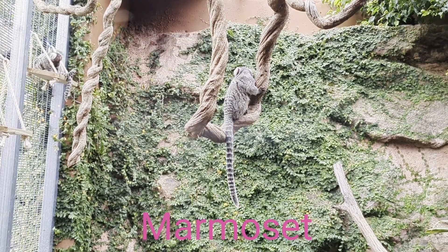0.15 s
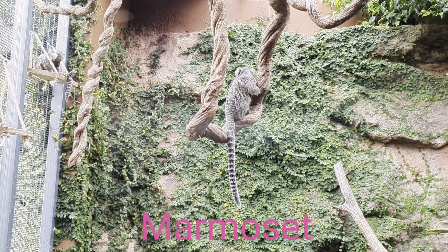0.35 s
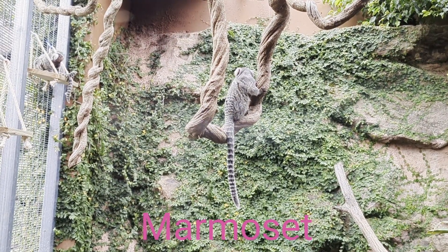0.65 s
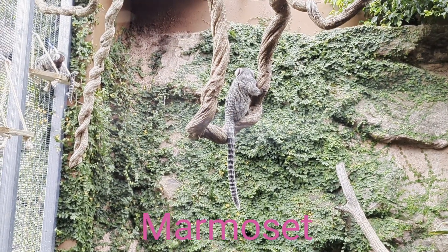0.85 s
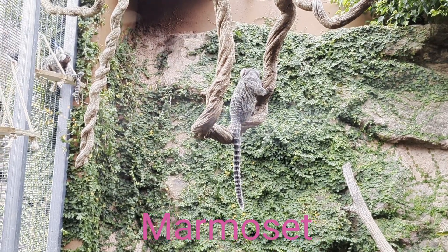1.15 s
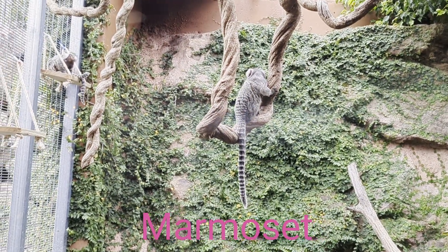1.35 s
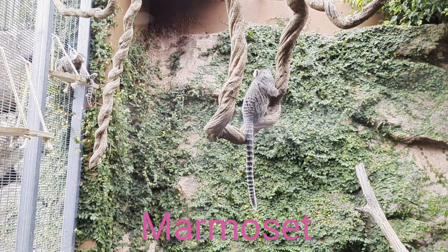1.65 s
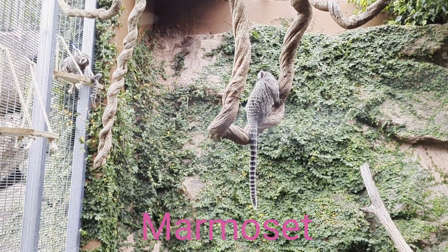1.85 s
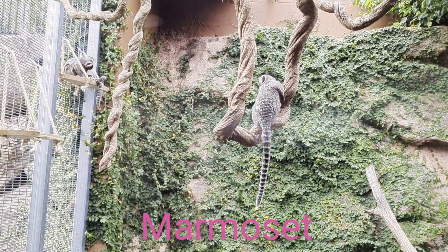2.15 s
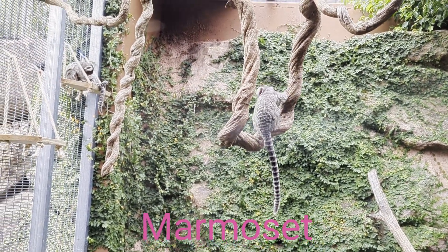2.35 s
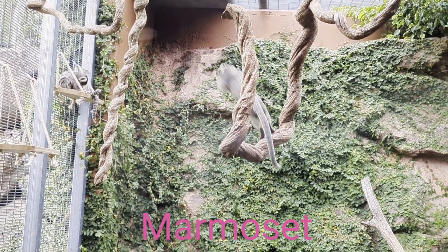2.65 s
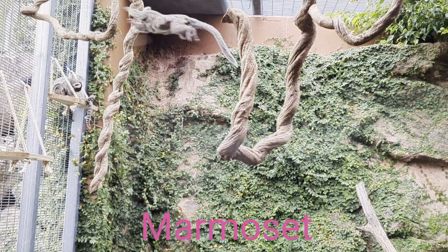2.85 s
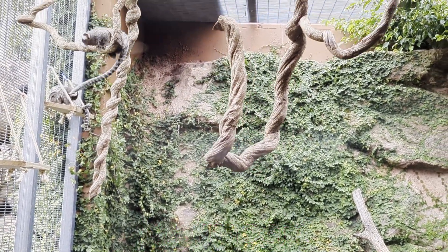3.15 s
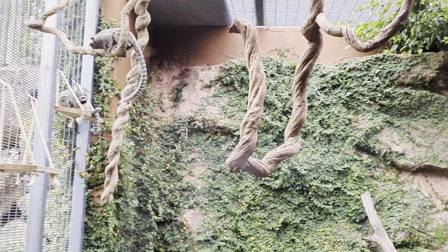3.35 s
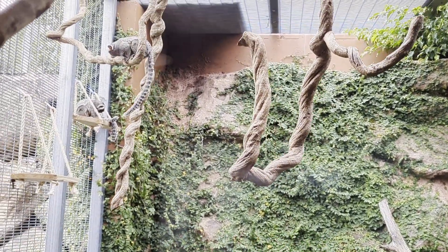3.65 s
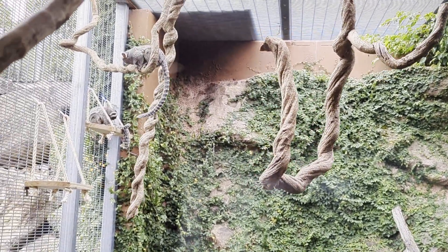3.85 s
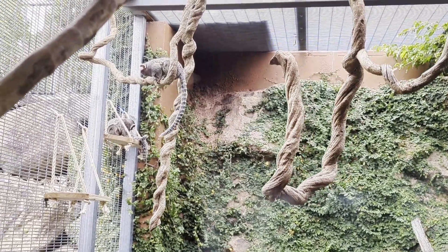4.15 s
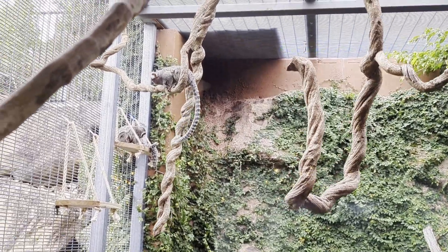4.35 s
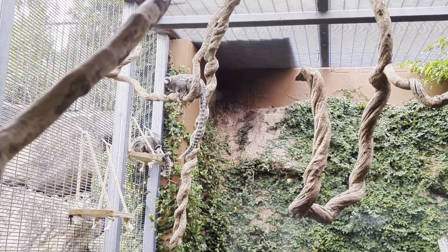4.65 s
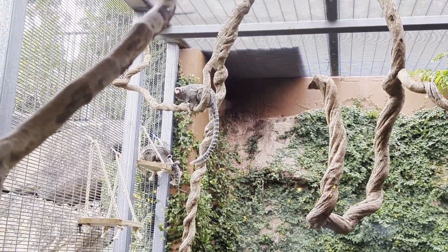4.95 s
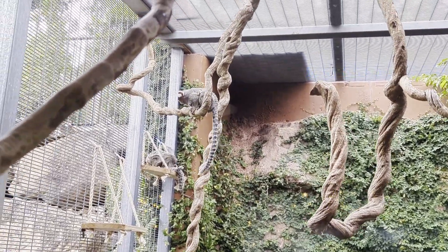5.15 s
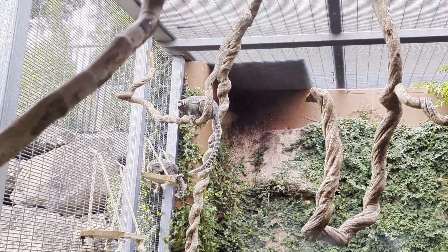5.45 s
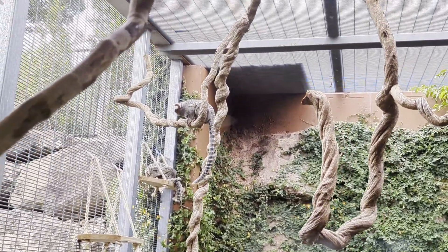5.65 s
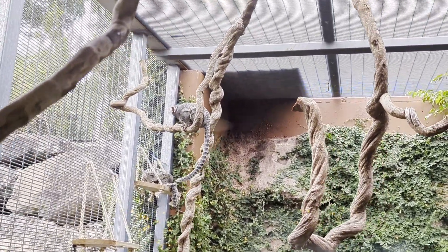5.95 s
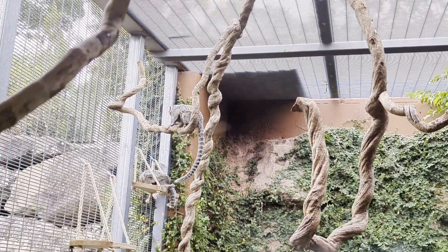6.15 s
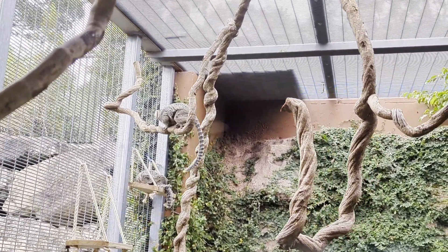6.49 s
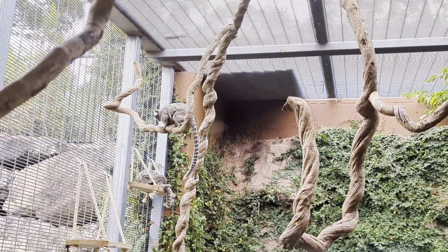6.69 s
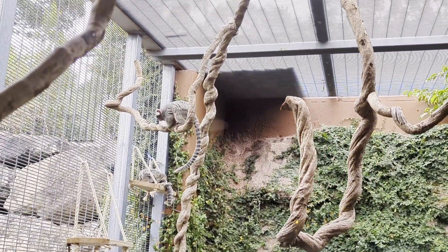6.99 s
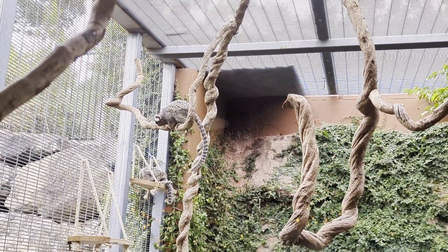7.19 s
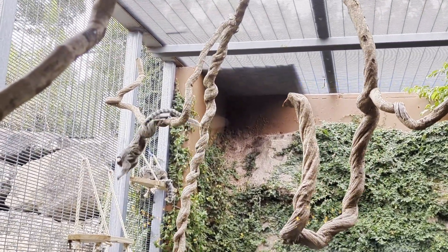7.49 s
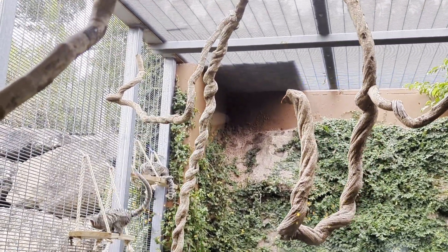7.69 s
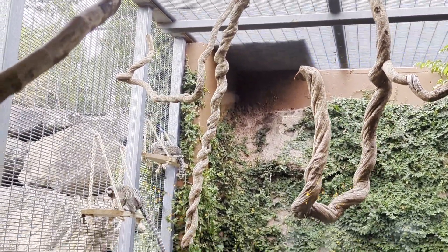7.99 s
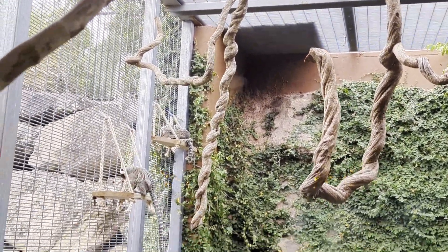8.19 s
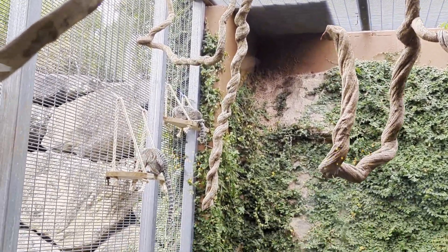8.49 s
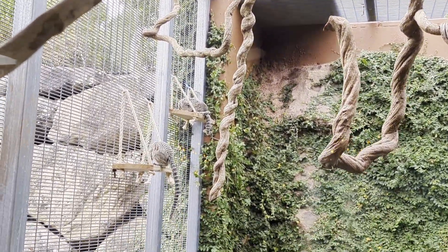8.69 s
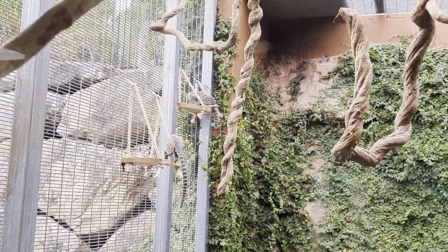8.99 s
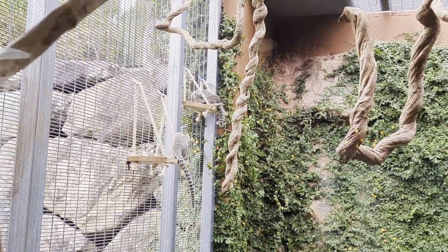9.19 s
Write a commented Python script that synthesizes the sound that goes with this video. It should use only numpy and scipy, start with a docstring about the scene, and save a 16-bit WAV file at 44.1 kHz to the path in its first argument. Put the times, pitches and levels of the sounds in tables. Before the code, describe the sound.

A somewhat distant microphone in a reverberant animal enclosure picks up airy, wavering background noise and tiny high monkey calls. Peeps and ticking chips come first, then a descending series of quick upward chirps, a scratchy scrabble as one animal jumps, and four brighter chirps. Then five piercing near-sine whistles climb, swell unevenly and drop off suddenly, with light echo from the walls and the noise thinning beneath them.

```python
"""Marmosets call in a rock-walled enclosure, over a ventilation-like haze of shaped noise that swells and sinks.
Thin gliding peeps and faint far chips come first, then a twitter of quick upward sweeps with a leap in pitch.
One animal leaps off a rope with a rustle of grainy noise, and a second twitter follows.
Five long rising whistles close it: near-sines, swelled by standing waves. The walls ring after every call,
and a noise suppressor turns the haze down under each held whistle."""
import sys
import numpy as np
from scipy import signal
from scipy.fft import rfft, irfft, next_fast_len
from scipy.io import wavfile
from scipy.ndimage import uniform_filter1d, minimum_filter1d, map_coordinates

SR = 44100
rng = np.random.default_rng(int(sys.argv[2]) if len(sys.argv) > 2 else 0)


def dump(signal):
    """Clip the signal to [-1, 1] and save it as 16-bit WAV at the path in sys.argv[1]."""
    limited = np.clip(np.atleast_2d(signal).T, -1, 1)
    pcm = np.round(limited * 32767).astype(np.int16)
    wavfile.write(sys.argv[1], SR, pcm)


N = 411453


def amp(db):
    """Level in decibels to amplitude ratio."""
    return 10 ** (np.asarray(db) / 20)


def evened(x):
    """Scales to unit effective (rms) amplitude."""
    return x / np.sqrt(np.mean(x ** 2) + 1e-20)


def read(points, hz):
    """Interpolates a table linearly along a logarithmic frequency axis."""
    f, value = np.transpose(points)
    return np.interp(np.log(hz + 1), np.log(f + 1), value)


def add(mix, s, sound):
    """Superposes a sound on the mix from time s [s], in place."""
    part = mix[max(round(s * SR), 0):][:len(sound)]
    part += sound[:len(part)]


def noise(gain):
    """Filtered noise: white noise weighted by the spectrum gain(Hz), brought to rms 1."""
    size = next_fast_len(N)
    spectrum = rfft(rng.standard_normal(size)) * gain(np.fft.rfftfreq(size, 1 / SR))
    return evened(irfft(spectrum, size)[:N])


def waver(size, hz):
    """Band-limited random modulation: a smooth curve through hz normal random values per second."""
    position = np.arange(size) / SR * hz
    return map_coordinates(rng.standard_normal(4096), [position], order=3, mode="wrap")


def voice(hz, level, octave, jitter, jitter_hz=260):
    """Frequency modulation: a sine of randomly unsteady pitch (jitter is a share of it) and its second harmonic."""
    unsteady_hz = hz * (1 + jitter * waver(len(hz), hz=jitter_hz))
    phase = 2 * np.pi * np.cumsum(unsteady_hz) / SR
    return np.sqrt(2) * (level * np.sin(phase) + octave * np.sin(2 * phase))


def whistle(s, length, db, start_hz, plateau_hz, settle_s, lift_hz, lift_s, drop_s, low_hz, fade_db,
            bright_db, octave_fade_db=-7, drop_jitter=0.023, edge_s=0.0012):
    """Resonance under a glide: with even effort, the loudness follows the standing waves the pitch passes through.

    The pitch scoops up to a plateau and lifts under a last push; as the pressure gives out it drops, unsteady."""
    # standing waves between the walls: (centre [Hz], half width at 1/e of the gain [Hz], gain [dB])
    standing = [(5994, 52, 9), (6070, 10, -9), (6087, 33, 11.5), (6150, 12, -8.5), (6201, 64.4, 17),
                (6310, 14, -7.5), (6375, 70, 7), (6527, 50, 6), (6560, 15, -11.5), (6667, 89, 15),
                (6870, 32, -8), (6880, 82, 10), (7161, 50, 6), (7477, 520, 18.7)]
    # level of the octave before its trim and wander: (frequency of the octave [Hz], level [dB])
    octave_level = [(11400, -73.5), (12200, -58.5), (12700, -49), (13050, -48.5), (13300, -49),
                    (14200, -50), (15400, -53)]
    onset_db, onset_s = -5.5, 0.034  # softer start, and the time constant of filling out
    flat_hz, flat_s = 230, 0.012  # flat start, and the time constant of catching the pitch
    wander_hz, wander_per_s = 4.4, 54  # random pitch wander and its rate
    crest_s = 0.006  # the lift crests this long before the drop

    t = np.arange(0, length + drop_s, 1 / SR)
    held = np.minimum(t, length)
    scoop = (start_hz - plateau_hz) * np.exp(-held / settle_s)
    lift = lift_hz * np.exp(-((length - crest_s - held) / lift_s) ** 2)
    hz = plateau_hz + scoop + lift - flat_hz * np.exp(-t / flat_s)
    hz = hz + wander_hz * waver(len(t), hz=wander_per_s)
    drop = np.sin(np.pi / 2 * np.clip((t - length) / drop_s, 0, 1)) ** 2

    # the levels follow the pitch before the drop; the drop then fades them
    standing_db = sum(gain_db * np.exp(-((hz - centre) / width) ** 2) for centre, width, gain_db in standing)
    level_db = db + onset_db * np.exp(-t / onset_s) + standing_db + fade_db * drop
    octave_wander_db = 5 * waver(len(t), hz=30.23)
    octave_db = read(octave_level, 2 * hz) + bright_db + octave_wander_db + octave_fade_db * drop

    edges = np.clip(np.minimum(t, t[-1] - t) / edge_s, 0, 1)
    sliding_hz = hz + (low_hz - hz) * drop
    jitter = 0.0008 + drop_jitter * np.sqrt(drop)
    return s, edges * voice(sliding_hz, amp(level_db), amp(octave_db), jitter, jitter_hz=900)


def twitter(s, db, lead, above_hz, flick, flick_hz, start_db=-26.5, knee_db=0.0, flick_db=-22, octave_db=-42):
    """Register leap: a slide grows louder, leaps up in pitch and ends in a fading upward flick."""
    # nominal speed and size: the curve of the slide makes it a little slower and the leap a little larger
    slide_hz_per_s, leap_hz = 51000, 719
    t = np.arange(-lead, flick, 1 / SR)
    slide = np.clip(1 + t / lead, 0, 1)
    up = np.clip(t / flick, 0, 1)

    slide_left = 1 - np.sin(0.98 * slide) / np.sin(1.1)
    lead_in_hz = above_hz - leap_hz - slide_hz_per_s * lead * slide_left
    rising_hz = above_hz + flick_hz * (0.296 * up + 0.78 * up ** 5)
    hz = np.where(t < 0, lead_in_hz, rising_hz)

    lead_in_db = start_db + (knee_db - start_db) * slide ** 2
    level = amp(db + np.where(t < 0, lead_in_db, flick_db * up ** 3))
    level = uniform_filter1d(level, size=30) * signal.windows.tukey(len(t), 0.08)
    octave = amp(db + octave_db) * np.sin(np.pi * slide)  # heard in the lead-in only
    return s - lead, voice(uniform_filter1d(hz, size=20), level, octave, jitter=0.031, jitter_hz=587)


def peep(s, length, db, start_hz, end_hz, bend=1.45):
    """Frequency glide: a short near-sine whose pitch flattens towards its end."""
    u = np.linspace(0, 1, round(length * SR))
    level = amp(db) * signal.windows.tukey(len(u), 0.5)
    hz = end_hz + (start_hz - end_hz) * (1 - u) ** bend
    return s, voice(hz, level, amp(-50) * level, jitter=0.0041)


def scrabbles(grain_db=3, grain_hz=600, snaps_per_s=170, snap_db=-2):
    """Friction noise: claws drag over fibre in grainy bursts, with small snaps where they catch."""
    # bursts on rope and leaves: (time of the peak [s], level [dB], rise [s], decay [s])
    bursts = [(2.405, -45, 0.012, 0.015), (2.467, -29.5, 0.012, 0.03), (2.585, -27, 0.024, 0.044),
              (2.593, -21, 0.0017, 0.0042), (2.665, -39.5, 0.013, 0.066), (2.755, -35, 0.0024, 0.0047),
              (2.901, -42, 0.0046, 0.084), (2.947, -40, .004, 0.0064), (3.189, -37.5, 0.0038, 0.022),
              (3.235, -38, 0.0036, 0.015), (7.49, -57, 0.023, 0.0054), (8.892, -49.5, 0.037, 0.028),
              (8.99, -39, 0.003, 0.0037)]
    # colour of the rustle: (frequency [Hz], relative level [dB])
    rustle = [(290, -50), (500, -27), (863, -31), (1150, -6.5), (1650, -9.5), (1800, 1), (2010, -17),
              (2650, -5.5), (3010, -8.5), (3190, -19), (5510, -29.5), (8480, -9), (9930, -16),
              (10800, -37.5), (15500, -40.5)]
    t = np.arange(N) / SR
    push = np.zeros(N)
    for s, db, rise, decay in bursts:
        time_constants = np.maximum((s - t) / rise, (t - s) / decay).clip(0, 40)
        push += amp(db) * np.exp(-time_constants)
    drag = evened(rng.standard_normal(N) * amp(grain_db * waver(N, hz=grain_hz)))
    snaps = evened(np.tanh(rng.standard_normal(N)) * (rng.random(N) < snaps_per_s / SR))
    size = next_fast_len(N)
    colour = amp(read(rustle, np.fft.rfftfreq(size, 1 / SR)))
    rubbing = irfft(rfft(drag + amp(snap_db) * snaps, size) * colour, size)[:N]
    return push * evened(rubbing)


def bumps(hz=170, decay=0.0044, body_db=-9):
    """Heavily damped impact: dull knocks, each a low push and a puff that hardly ring."""
    # soft knocks: (time [s], level before the doubling below [dB])
    knocks = [(2.215, -43), (2.242, -46.5)]
    out, t = np.zeros(N), np.arange(SR // 10) / SR
    body = signal.butter(2, [220, 650], "bandpass", fs=SR, output="sos")
    for s, db in knocks:
        puff = amp(body_db) * evened(signal.sosfilt(body, rng.standard_normal(len(t))))
        knock = np.exp(-t / decay) * (np.sin(2 * np.pi * hz * t) + puff)
        add(out, s, amp(db) * 2 * knock)
    return out


def chip(s, db, hz, length=0.014, spread=0.038):
    """Random frequency modulation: fast jitter makes a tiny note raspy, almost a tick."""
    size = round(length * SR)
    level = amp(db) * np.hanning(size)
    return s - length / 2, voice(np.full(size, float(hz)), level, 0, jitter=spread, jitter_hz=815)


def haze(patchy_db=1.74, low_cut_hz=40):
    """Broadband noise in bands: roar, hiss and fan tones swell and sink while the rumble stays nearly steady."""
    # colours of the three noises: (frequency [Hz], relative level [dB])
    roar = [(76, -51), (130, -23.5), (326, -17), (364, -11.5), (470, -22.5), (600, -16.5), (706, -15.5),
            (786, -9.5), (853, -9), (1210, -1.5), (1350, -4.5), (1840, -6), (2000, -15), (2770, -8),
            (3300, -20.5), (4290, -47.5), (7260, -120)]
    hiss = [(2800, -16.5), (3200, -11), (3900, -3.5), (4300, -4.5), (4600, -12.5), (4850, -5.5),
            (5200, -3.5), (6200, -8.5), (7500, 5), (9600, -3), (10500, -14.5), (13500, -20.5),
            (15500, -29.5)]
    rumble = [(13, -49.5), (22, -3), (38, -2.5), (59, 3), (89, -1), (124, -13.5), (170, -20), (220, -46.5),
              (370, -120)]
    # fan tones as narrow noise bands: (frequency [Hz], level before the swell [dB], width at half amplitude [Hz])
    hum = [(54, -69, 8.1), (301.7, -69, 11), (613, -66, 47), (806.6, -62.5, 1.4), (1196.6, -55, 2.7),
           (1852, -62.5, 13)]
    # course of the haze: (time [s], low level [dB], middle level [dB], high level [dB])
    swell = [(0, -63.5, -51.5, -53), (1.1, -63.5, -51.5, -50.5), (2.5, -62, -47.5, -52.5),
             (4.5, -60, -45, -55), (4.802, -51, -50, -62), (5.25, -62, -57.5, -68),
             (5.749, -56.5, -53.5, -71.5), (6.3, -67, -58.5, -66.5), (7.35, -68, -58.5, -69.5),
             (8.101, -65, -52.5, -63.5), (8.499, -65.5, -56.5, -68.5), (8.899, -61.5, -48, -56),
             (9.33, -65.5, -51, -63)]
    # usual level of the haze: low, middle, high [dB]
    usual_db = [-60.5, -46, -52]
    # how far each frequency follows the low, middle and high level, one list each: (frequency [Hz], share)
    follow = ([(60, 0.2), (250, 0.36), (400, 1), (600, 0.77), (900, 0.41)], [(600, 0.055), (900, 0.61),
              (1800, 0.9), (2200, 0.42), (3200, 0.0066), (4500, 0.36), (8000, 0.35), (11000, 0.43),
              (14000, 0.063)], [(1800, 0), (2200, 0.27), (2900, 0.9), (3500, 0.25), (4500, 0), (9000, 0.26),
              (12000, 0)])

    # levels before the swell [dB]
    air = amp(-46.5) * noise(lambda f: amp(read(roar, f)))
    air += amp(-54.5) * noise(lambda f: amp(read(hiss, f)) * (f > 2000))
    air += amp(-58.5) * noise(lambda f: amp(read(rumble, f)) * np.minimum(f / low_cut_hz, 1) ** 8)
    for hz, db, width in hum:
        air += amp(db) * noise(lambda f: 1 / (1 + (1.34 * (f - hz) / width) ** 2) ** 2)

    f, t, z = signal.stft(air, SR, nperseg=1024, noverlap=768)
    s, *levels = np.transpose(swell)
    swell_db = sum(np.outer(read(shares, f), np.interp(t, s, level) - usual)
                   for shares, level, usual in zip(follow, levels, usual_db))
    # random louder and softer patches in time and frequency
    patches = uniform_filter1d(rng.standard_normal(z.shape), size=14, axis=0)
    patches = evened(uniform_filter1d(patches, size=8, axis=1))
    gain_db = swell_db + patchy_db * patches * (f[:, None] > 130)
    return signal.istft(z * amp(gain_db), SR, nperseg=1024, noverlap=768)[1][:N]


def enclosure(x, wet_db, early_db=4, early_s=0.031, with_echoes=True):
    """Reverberation: wall echoes, then a coloured diffuse ring, strongest at first and shortest at the very top."""
    # separate wall echoes: (delay [s], gain)
    wall_echoes = [(.0013, 0.12), (.0047, 0.46), (.0113, -0.1), (.0187, .16), (.029, 0.087)]
    # reverberation time without the early boost: (frequency [Hz], time to fall 60 dB [s])
    ring_time = [(300, 0.36), (2000, 0.44), (7000, 0.69), (10000, 0.75), (15000, 0.21)]
    # colour of the ring: (frequency [Hz], relative level [dB])
    walls = [(300, -1.5), (3000, -22), (4500, -7), (5400, 3.5), (5800, 2), (6150, -8.5), (6450, 1.5),
             (6800, -0.5), (7150, 1.5), (7550, 0), (8300, -0.5), (10000, -2.5), (15000, -1)]
    f, t, z = signal.stft(rng.standard_normal(SR), SR, nperseg=256)
    decay_db = -60 * t / read(ring_time, f)[:, None]
    ring_db = read(walls, f)[:, None] + decay_db + early_db * np.exp(-t / early_s)
    tail = signal.istft(z * amp(ring_db), SR, nperseg=256)[1]
    tail = tail * np.clip(np.arange(len(tail)) / SR / 0.0023, 0, 1)  # builds up over 2.3 ms
    response = amp(wet_db) * tail / np.linalg.norm(tail)
    response[0] = 1  # direct sound
    if with_echoes:
        for delay, gain in wall_echoes:
            add(response, delay, np.array([gain]))
    return signal.fftconvolve(x, response / np.linalg.norm(response))[:N]


def suppressor(x, count=20):
    """Spectral gain control: a high tone that holds its pitch for count frames turns other frequencies down."""
    # share of the cut that each frequency takes: (frequency [Hz], share)
    cut_share = [(80, 0.031), (250, 0.067), (450, 0.27), (1000, 0.61), (2800, 0.75), (4500, 1),
                 (5400, 0.012), (5800, 0.32), (7700, 0), (8300, 0.72), (10500, 0.49), (11800, 0),
                 (15000, 0.002)]
    held_tone_db, cut_per_db = -59, 0.31  # threshold of a held tone, and cut per dB above it
    f, t, z = signal.stft(x, SR, nperseg=1024, noverlap=768)
    band = abs(z[(f > 5000) & (f < 8000)])
    # the minimum over the latest frames is large only where a tone stays in its bin
    held = minimum_filter1d(band, size=count, axis=1, origin=(count - 1) // 2)
    held_db = uniform_filter1d(10 * np.log10((held ** 2).sum(0) + 1e-14), size=9)
    cut_db = np.outer(read(cut_share, f), cut_per_db * np.maximum(held_db - held_tone_db, 0))
    return signal.istft(z * amp(-cut_db), SR, nperseg=1024, noverlap=768)[1][:N]


def scene():
    """Superposition at several depths: whistles nearest, peeps and twitters deeper, chips far off, and the haze."""
    # the levels in these four tables stand before the walls and the mix
    # long whistles: (time [s], length [s], level before standing waves [dB], start [Hz], plateau [Hz],
    # settling [s], final lift [Hz], lift [s], drop [s], lowest pitch of the drop [Hz], fade of the drop [dB],
    # trim of the octave [dB])
    whistle_rows = [(4.652, 0.83, -34.5, 5389, 5510, 0.19, 1004, 0.83, 0.053, 5400, -3, 1),
                    (5.722, 0.52, -33.5, 5827, 6558, 0.11, 129.7, .12, 0.064, 5420, -20, 2),
                    (6.496, 0.52, -34.5, 5825, 6672, 0.098, 275, 0.06, 0.062, 5490, -16, -0.5),
                    (7.269, .52, -35.5, 5870, 6730, .134, 447, .049, .06, 5530, -23.5, -1),
                    (8.08, 0.61, -36.5, 5690, 6733, 0.14, 951, .12, 0.048, 6420, -22, -1.5)]
    # twitter notes: (time of the leap [s], level [dB], lead-in [s], pitch after the leap [Hz], flick [s],
    # approximate height of the flick [Hz])
    twitter_rows = [(0.729, -35, .015, 8170, 0.008, 1700), (.876, -33, 0.027, 8100, .0098, 2100),
                    (1.015, -33, 0.024, 7930, 0.0085, 1780), (1.151, -31, 0.017, 7750, 0.017, 1970),
                    (1.288, -31.5, .019, 7710, 0.013, 2430), (1.418, -41.5, .032, 7550, 0.022, 2400),
                    (1.567, -40.5, 0.016, 7380, 0.025, 2520), (1.83, -45, 0.014, 7390, .042, 4300),
                    (3.353, -26.5, 0.026, 8070, 0.016, 2010), (3.509, -26.5, 0.031, 8050, 0.013, 1550),
                    (3.662, -28.5, 0.034, 7870, 0.022, 1480), (3.813, -30.5, 0.033, 7700, .039, 1170)]
    # short peeps: (time [s], length [s], level [dB], start [Hz], end [Hz])
    peep_rows = [(.0, 0.039, -48, 6000, 7390), (0.218, 0.015, -54.5, 8000, 9400),
                 (0.487, 0.017, -42, 6240, 6410), (0.505, 0.11, -44, 6380, 7030),
                 (0.545, 0.035, -52.5, 8670, 9670), (0.554, 0.09, -45.5, 6870, 7060),
                 (0.637, 0.0144, -52, 6670, 8200), (2.134, 0.029, -49, 8160, 9110),
                 (2.157, 0.0318, -46, 8200, 9200), (3.152, .022, -54.5, 8400, 8880),
                 (3.197, 0.03, -47, 9360, 9750), (3.938, 0.06, -38.5, 7110, 7710),
                 (4.373, 0.039, -61, 9550, 9700), (4.424, 0.024, -51, 8650, 7600)]
    # far chips: (time of the middle [s], level [dB], pitch [Hz])
    chip_rows = [(.085, -52, 4930), (.156, -51, 5050), (.223, -47, 4870), (.299, -51, 4880),
                 (.515, -47, 4200), (0.718, -46, 4100), (.815, -49, 4060), (.921, -53, 4300),
                 (1.832, -54, 3980), (1.870, -50, 4170), (1.923, -49, 4150), (1.977, -50, 4120),
                 (2.166, -51, 3980), (3.04, -53, 4100), (3.887, -48, 3960), (3.952, -48.5, 4060),
                 (4.578, -52.5, 4000), (5.723, -54.5, 3740), (6.497, -55, 3770), (7.274, -60, 3800)]

    whistles, twitters, peeps, chips = np.zeros((4, N))
    for place, call, rows in ((whistles, whistle, whistle_rows), (twitters, twitter, twitter_rows),
                              (peeps, peep, peep_rows), (chips, chip, chip_rows)):
        for row in rows:
            add(place, *call(*row))

    # the first echoes of the whistles are in the standing waves
    calls = amp(-0.03) * enclosure(whistles, wet_db=-10.5, early_db=5.5, with_echoes=False)
    calls += amp(3.5) * enclosure(twitters, wet_db=-1.0, early_db=7.5)
    calls += amp(7.5) * enclosure(peeps, wet_db=-4.0, early_db=6.0)
    movement = enclosure(scrabbles(), wet_db=-4.5, early_db=11) + bumps()
    far_calls = amp(-1) * enclosure(chips, wet_db=-8, early_db=4.5)
    return (calls + movement + far_calls + haze())[None]


def record(dry):
    """Band limitation: noise suppression, then a steep low-pass at 15550 Hz."""
    quieted = suppressor(dry[0])[None]
    low_pass = signal.firwin(511, 15550, window=("kaiser", 9), fs=SR)
    return signal.oaconvolve(quieted, low_pass[None], "same")


dry = scene()
out = record(dry)
dump(out)
```